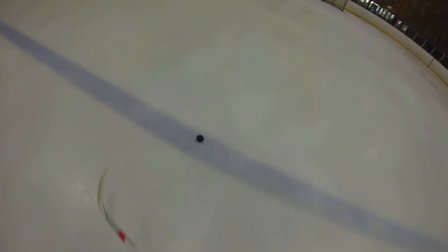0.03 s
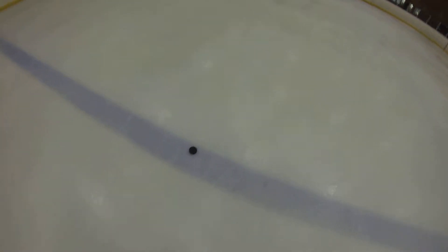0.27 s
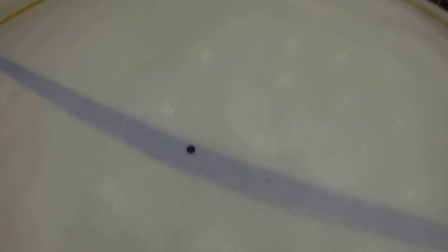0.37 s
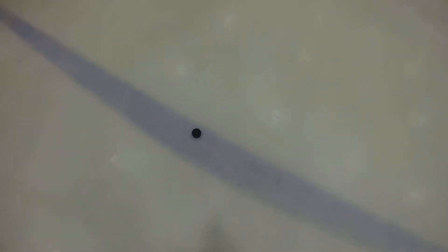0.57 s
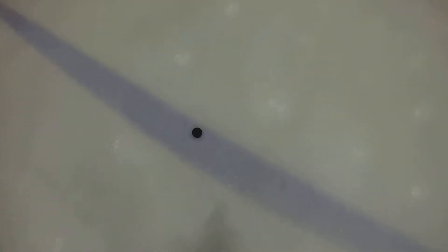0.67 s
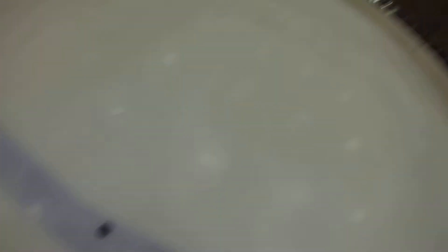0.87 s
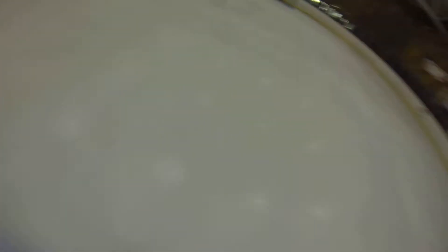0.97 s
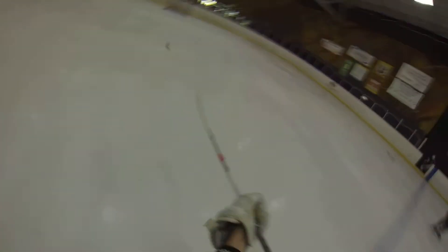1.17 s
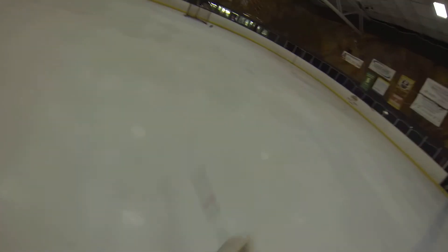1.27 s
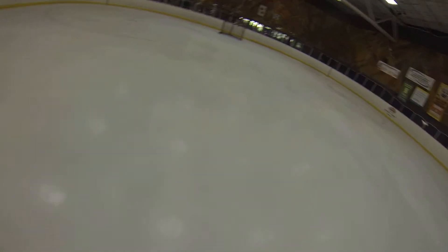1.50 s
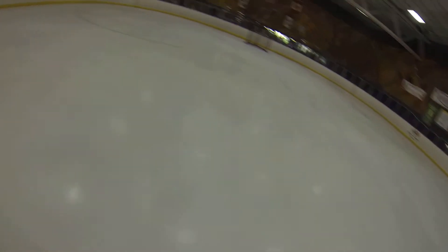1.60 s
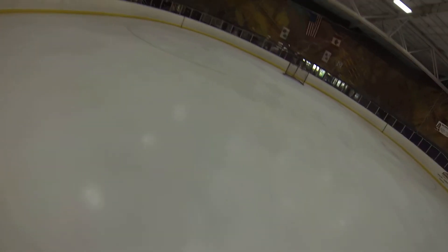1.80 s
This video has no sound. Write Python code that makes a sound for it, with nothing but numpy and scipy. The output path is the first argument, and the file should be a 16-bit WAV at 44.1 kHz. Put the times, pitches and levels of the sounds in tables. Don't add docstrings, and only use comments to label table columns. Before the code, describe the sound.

Slap shot in an indoor ice rink, close and boxy: low shuddering and clunks build up, the stick slaps ice and cracks the puck, gritty ice ticks scatter, then subdued blade hiss and hall hum continue.

```python
import sys
import numpy as np
from scipy import signal
from scipy.fft import rfft, irfft, next_fast_len
from scipy.io import wavfile
from scipy.ndimage import uniform_filter1d, map_coordinates

SR = 44100
rng = np.random.default_rng(int(sys.argv[2]) if len(sys.argv) > 2 else 0)


def to_wav(s):
    ch = np.atleast_2d(s).T
    pcm = np.round(np.clip(ch, -1, 1) * 32767)
    wavfile.write(sys.argv[1], SR, pcm.astype(np.int16))


def volts(x):
    e = np.asarray(x, float) / 20
    return 10 ** e


N = 81585
SHOT_S = 0.9815


def unit(x):
    return x / np.sqrt(np.mean(x ** 2) + 1e-20)


def along(points, hz):
    f, value = np.transpose(points)
    return np.interp(np.log(hz + 1), np.log(f + 1), value)


def curve(rows):
    s, value = np.transpose(rows)
    return np.interp(np.arange(N) / SR, s, value)


def wobble(rate):
    return map_coordinates(rng.standard_normal(200), [np.arange(N) * rate / SR])


def filtered(x, response):
    m = next_fast_len(len(x) + 8192)
    return irfft(rfft(x, m) * response(np.fft.rfftfreq(m, 1 / SR)), m)[:len(x)]


def noise(spectrum):
    return unit(filtered(rng.standard_normal(N), lambda hz: volts(along(spectrum, hz))))


def add(track, s, sound):
    part = track[round(s * SR):][:len(sound)]
    part += sound[:len(part)]


# t/s, peak level/dB, contact length/s
CONTACTS = [(0.127, -31.5, 0.013), (0.299, -28, 0.016), (0.28, -30, .006), (0.353, -31, 0.0033),
            (0.6504, -24.5, 0.0027), (.655, -24, 0.0045), (0.66, -33.5, 0.0056), (0.6817, -35.5, 0.0021),
            (.736, -28, 0.0073), (0.747, -27, 0.0033), (0.784, -31, 0.0073), (.842, -34.5, 0.005),
            (0.856, -38, 0.018), (0.762, -28.5, 0.0043), (0.799, -29.5, 0.0073), (0.81, -25.5, 0.0067),
            (0.878, -26.5, 0.0099), (0.9074, -15, 0.0031), (0.9135, -19, 0.0017), (0.915, -22, 0.0029),
            (0.923, -31, .006), (.932, -33.5, 0.0064), (.9622, -17, .0008), (.9655, -29, .002),
            (.968, -23, .001), (.9697, -10.5, .0008), (.973, -27, .0015), (.9755, -25, .0015),
            (.9806, -6, .002), (.983, -10, .0015), (.9852, -12, .002), (.9925, -30, .002),
            (.9958, -16.5, .002), (1.008, -30, .003), (1.005, -39, 0.0032), (1.042, -31, 0.0012),
            (1.069, -32, 0.009), (1.08, -22.5, 0.0026), (1.085, -24, 0.0019), (1.089, -34, 0.0032),
            (1.123, -38, .002), (1.132, -34.5, 0.0027), (1.1583, -31, 0.003), (1.341, -24, 0.003),
            (1.719, -28.5, 0.0039)]
# f/Hz, level/dB, t60/s
BLADE = [(870, -38, .03), (1060, -25, 0.025), (1990, -21, 0.02), (2350, -30, .015), (2980, -27, .015),
         (3310, -18, 0.022), (3750, -28, .015), (4230, -29, 0.02)]
DULL_HZ, THIN_HZ = 2400, 1150
SNAP, TOUCH_S = 2.2, 0.0008
BLADE_ROUGH_HZ = 200


def contacts():
    out, t = np.zeros(N), np.arange(SR // 16) / SR
    onset = 1 - np.exp(-t / TOUCH_S)

    def soft(f):
        lowpass = (1 + 1j * f / DULL_HZ) ** -4.0
        highpass = (1j * f / (THIN_HZ + 1j * f)) ** 2
        return lowpass * highpass

    scrapes = rng.standard_normal((len(CONTACTS), len(t)))
    for (s, level_db, length_s), scrape in zip(CONTACTS, scrapes):
        burst = scrape * np.exp(-(t / length_s) ** 2) * onset + SNAP * (t == 0)
        sound = case(filtered(burst, soft))
        add(out, s, volts(level_db) * sound / np.abs(sound).max())
    for hz, level_db, t60 in BLADE:
        grain = rng.standard_normal(len(t))
        rough = unit(filtered(grain, lambda f: 1 / (1 + ((f - hz) / BLADE_ROUGH_HZ * 2) ** 2)))
        mode = np.sin(2 * np.pi * hz * t) + rough
        add(out, SHOT_S, volts(level_db - 60 * t / t60) * mode * onset)
    return out


# t/s, rms level/dB, rise/s, fall/s
SPRAY = [(0.284, -87, 0.0025, 0.0045), (.372, -61.5, 0.1, 0.11), (.75, -69, 0.044, .05),
         (.945, -49, 0.0012, .002), (.971, -33, .0009, .001), (.975, -45, .002, .002),
         (.983, -25, .0012, .0016), (.9865, -36, .002, .003), (.998, -40, .0015, .002),
         (1.024, -43.5, 0.0075, 0.0086), (1.036, -48, 0.00088, 0.0014), (1.047, -63, 0.0011, .001),
         (1.054, -44, 0.0034, 0.0012), (1.0646, -48.5, 0.00032, .0007), (1.074, -63, 0.00076, .001),
         (1.106, -63, 0.00097, .001), (1.1332, -48.5, 0.001, .002)]
# f/Hz, level/dB
GRIT = [(1550, -42), (2650, -10.5), (3450, 4), (4250, -4.5), (5250, -9.5), (6350, -6.5), (8100, -15.5),
        (15600, -38.5)]


def spray():
    t = np.arange(N) / SR
    swell = np.zeros(N)
    for s, level_db, rise_s, fall_s in SPRAY:
        shape = np.where(t < s, ((s - t) / rise_s) ** 2, (t - s) / fall_s)
        swell += volts(level_db) * np.exp(-shape)
    return swell * volts(2 * wobble(100)) * noise(GRIT)


# f/Hz, width/Hz, level/dB
CASE = [(240, 130, -13), (959, 220, -16.5), (1305, 175, -0.5), (1561.5, 196, 3), (2130, 493, -9.5),
        (3186, 335, -12.5), (3880, 600, -16.5), (5950, 4700, -20.5)]


def case(x):
    def response(f):
        total = 0
        for k, (centre, width, level_db) in enumerate(CASE):
            damping = 1j * f * width
            total = total + (-1) ** k * volts(level_db) * damping / (centre ** 2 - f ** 2 + damping)
        return total

    return filtered(x, response)


# t/s, peak level/dB, f/Hz, rattle/s
KNOCKS = [(0.113, -36.5, 240.7, 0.018), (0.196, -41.5, 226, 0.02), (0.247, -36, 215, 0.01),
          (0.279, -28.5, 278, 0.0013), (0.292, -36, 340, 0.012), (0.503, -43, 200, 0.0067),
          (0.532, -42.5, 240, 0.0042), (0.572, -19, 250, 0.0041), (0.631, -29.5, 300, 0.0026),
          (.639, -36.5, 420, 0.0047), (0.65, -20, 215, 0.0078), (.656, -28.5, 383, 0.006),
          (.659, -30.5, 514, 0.0096), (.65, -35, 940, 0.019), (.674, -30, 280, 0.0055),
          (.687, -36, 255, 0.012), (.746, -38.5, 895, .006), (.812, -41, 874, 0.0095),
          (.908, -38.5, 940, 0.0085), (.912, -27.5, 558, 0.0095), (1.067, -42, 550, 0.0082),
          (1.069, -36, 910, 0.0052), (1.08, -37, 518, 0.0099), (1.083, -39.5, 864, 0.012),
          (1.03, -39.5, 440, 0.018), (1.128, -41, 880, .006), (1.132, -40, 600, 0.005),
          (1.14, -47, 935, 0.0049), (1.157, -44.5, 523, 0.0081), (1.16, -50, 890, 0.015),
          (.995, -40.5, 526, 0.018), (.28, -37.5, 554, 0.0067), (.93, -42.5, 380, .03),
          (0.682, -34.5, 537, 0.0088), (0.742, -40.5, 300, 0.026), (0.784, -32, 253.4, 0.02),
          (0.813, -40, 290, 0.012), (.854, -40, 255, 0.024), (0.904, -30, 233, 0.016),
          (1.03, -52, 150, 0.0088), (1.037, -23.5, 161, 0.006), (1.05, -17, 126, 0.0026),
          (1.08, -36, 307, 0.01), (1.122, -40.5, 225, 0.01), (1.217, -35.5, 247, 0.0057),
          (1.311, -41, 240, 0.015), (1.393, -38.5, 238, 0.024),
          (.295, -36.5, 500, 0.011), (.31, -41.5, 390, 0.028), (.745, -36, 450, .008),
         (.965, -35, 590, 0.0059), (.96, -36.5, 240, .03), (1.095, -29.5, 160, 0.0068),
         (1.4, -42.5, 180, 0.0066), (0.66, -30.5, 520, .008), (0.1, -45, 450, .01), (1.5, -39, 512, 0.0065),
         (1.035, -38, 810, 0.013), (.905, -33.5, 390, 0.011)]
KNOCK_T60, KNOCK_RISE_S, RATTLE_DB = 0.036, 0.0018, -7.5
LOOSE_HZ, RATTLE_WIDTH = 600, 0.3


def mount():
    out, t = np.zeros(N), np.arange(SR // 8) / SR
    knocks = KNOCKS
    grains = rng.standard_normal((len(knocks), len(t)))
    for (s, level_db, hz, rattle_s), grain in zip(knocks, grains):
        def band(f):
            damping = 1j * f * hz * RATTLE_WIDTH
            return (1j * f * hz / (hz * hz - f * f + damping)) ** 2

        decay = volts(-60 * np.maximum(t - rattle_s, 0) / KNOCK_T60)
        envelope = decay * (1 - np.exp(-t / KNOCK_RISE_S))
        ring = np.sin(2 * np.pi * hz * t) / (1 + (hz / LOOSE_HZ) ** 4)
        rattle = volts(RATTLE_DB) * hz / LOOSE_HZ * unit(filtered(grain, band))
        add(out, s, volts(level_db) * envelope * (ring + rattle))
    return out


# t/s, level/dB
SWAY = [(0.0, -28), (0.056, -21.5), (0.148, -32), (0.194, -19), (0.406, -17), (0.488, -20.5), (0.55, -13),
        (0.69, -18.5), (0.772, -7), (1.056, -7), (1.282, -33), (1.56, -17), (1.818, -28.5), (1.85, -22)]
# f/Hz, level/dB
SHUDDER = [(15, -11.5), (26, 6.5), (40, -3), (60, -7.5), (85, -23.5), (130, -31.5), (400, -38),
           (2500, -115)]
# t/s, peak level/dB, f/Hz, t60/s
JOLTS = [(0.289, -8, 53.3, 0.037), (0.334, -15.5, 54, 0.027), (0.595, -11.5, 66.2, 0.064),
         (0.743, -11, 40.5, 0.033), (0.754, -24, 63.8, 0.32), (0.818, -13, 60.4, 0.17),
         (0.884, -9, 64.8, 0.15), (0.955, -14, 38.3, 0.12), (1.011, -8.5, 55.6, 0.12),
         (1.044, -8, 64.8, 0.12), (1.05, -23, 34.8, 0.043), (1.085, -24.5, 68.5, 0.34),
         (1.123, -12, 43.4, 0.08), (1.297, -23.5, 53.3, 0.244), (1.356, -21.5, 65.5, 0.15),
         (1.414, -17.5, 51.5, 0.14), (1.619, -19, 37, 0.16), (1.679, -16.5, 40, 0.12),
         (1.741, -20.5, 61.6, 0.11), (1.84, -18.5, 54.5, 0.1)]
NOD_HZ, NOD_WANDER = 15, 0.185
SHUDDER_DB, SHUDDER_GROWS = -8.5, 0.78


def sway():
    db, t = curve(SWAY), np.arange(SR // 4) / SR
    phase = 2 * np.pi * NOD_HZ * np.cumsum(1 + NOD_WANDER * wobble(9.5)) / SR
    out = volts(db + 1.5) * np.cos(phase - phase[round(SHOT_S * SR)])
    shudder_db = db.mean() + SHUDDER_GROWS * (db - db.mean()) + SHUDDER_DB
    out += volts(shudder_db) * noise(SHUDDER)
    for s, level_db, hz, t60 in JOLTS:
        decay = volts(level_db + 8 - 60 * t / t60)
        add(out, s, decay * np.sin(2 * np.pi * hz * t) * (1 - np.exp(-t / 0.017)))
    return out


HALL_DB, HALL_T60, HALL_BUILD_S = -12.5, 0.16, 0.013


def hall(x):
    t = np.arange(SR // 2) / SR
    build = 1 - np.exp(-(t / HALL_BUILD_S) ** 2)
    tail = rng.standard_normal(len(t)) * volts(-60 * t / HALL_T60) * build
    return signal.fftconvolve(x, tail / np.linalg.norm(tail))[:N]


# t/s, level/dB
GLIDE = [(0.0, -44), (0.742, -43), (0.89, -41.5), (1.066, -49.5), (1.256, -37.5), (1.41, -38.5),
         (1.85, -39.5)]
# f/Hz, level/dB
AIR = [(100, -32.5), (300, -15), (600, 3), (1500, -3.5), (3000, -1.5), (5550, -17), (10100, -31.5),
       (13400, -62)]


def rink():
    z = signal.stft(noise(AIR), nperseg=512)[2]
    patches = uniform_filter1d(rng.standard_normal(z.shape), 6, 0)
    patches = uniform_filter1d(patches, 8, 1)
    hiss = signal.istft(z * volts(1.1 * unit(patches)), nperseg=512)[1][:N]
    level_db = curve(GLIDE) + 0.89 * wobble(60) + 0.54 * wobble(10.4) + 0.97
    return volts(level_db) * unit(case(hiss))


DUCK_S, DUCK_DB = 0.93, -2.5
DUCK_ATTACK_S, DUCK_HOLD_S, DUCK_RELEASE_S = 0.022, 0.18, 0.22


def duck():
    t = np.arange(N) / SR - DUCK_S
    fall = np.clip(t / DUCK_ATTACK_S, 0, 1)
    rise = np.clip((t - DUCK_ATTACK_S - DUCK_HOLD_S) / DUCK_RELEASE_S, 0, 1)
    return volts(DUCK_DB * fall * (1.5 - rise))


# f/Hz, level/dB
HISS = [(310, -12.5), (3100, -2), (8100, -4.5), (12200, -7), (13600, -18), (16100, -25)]
# t/s, level/dB
PREAMP = [(0, 4.2), (1.052, 3), (1.102, -5), (1.202, -6), (1.652, -8), (1.802, -5), (1.85, -0.5)]
HISS_DB = -76.5


def microphone_hiss():
    return volts(HISS_DB + curve(PREAMP) + 1.4 * wobble(23)) * noise(HISS)


def scene():
    hits = contacts()
    ducked = duck() * (rink() + volts(HALL_DB) * hall(hits))
    return (hits + spray() + ducked + mount() + sway())[None]


def band_limit(x):
    return signal.sosfilt(signal.butter(12, 15760, fs=SR, output="sos"), x)


OFFSET = -0.0075


def record(dry):
    dry = dry + microphone_hiss()
    limited = dry / (1 + np.abs(dry) ** 12) ** (1 / 12)
    return band_limit(limited + OFFSET)


dry = scene()
out = record(dry)
to_wav(out)
```